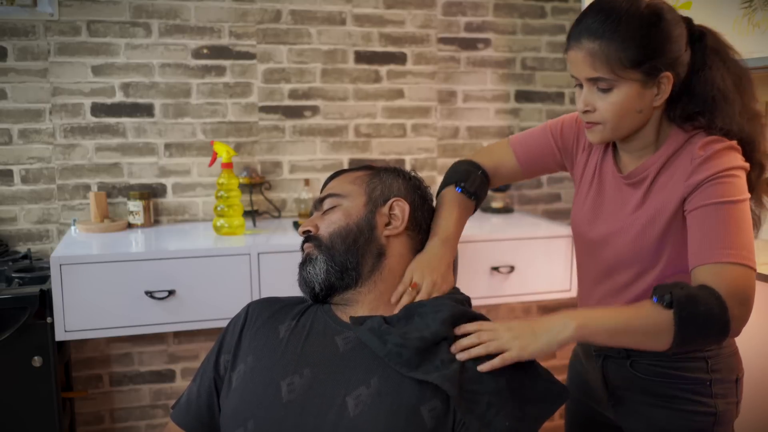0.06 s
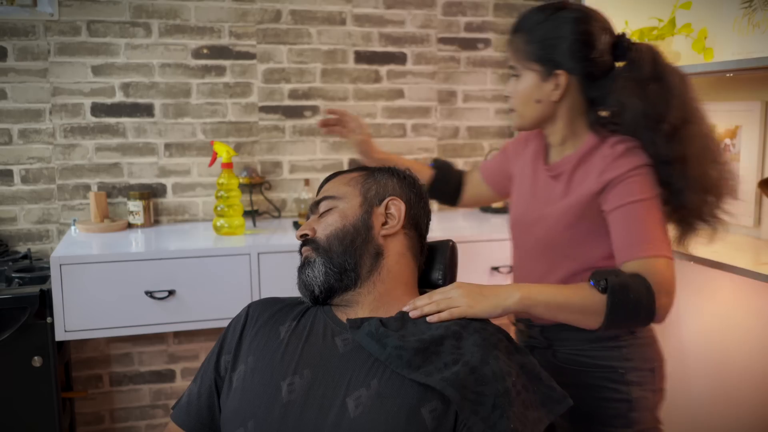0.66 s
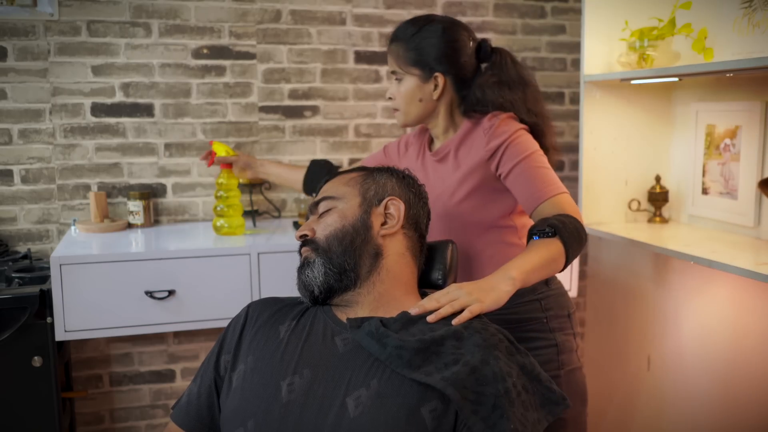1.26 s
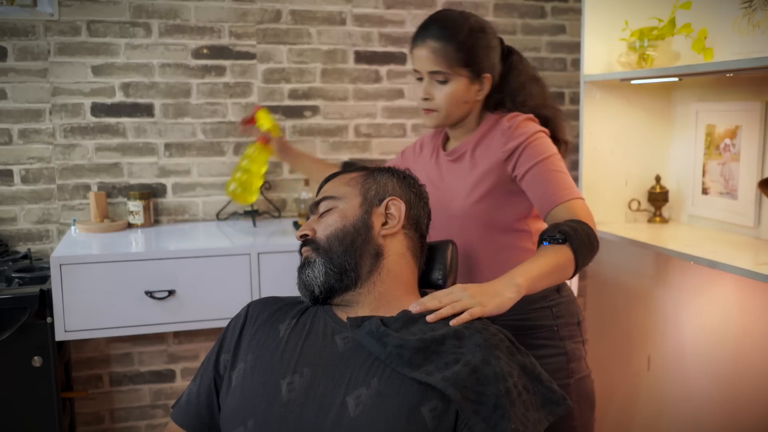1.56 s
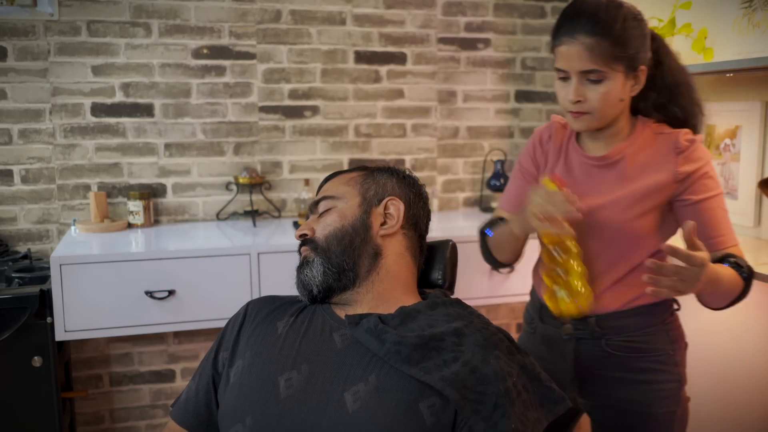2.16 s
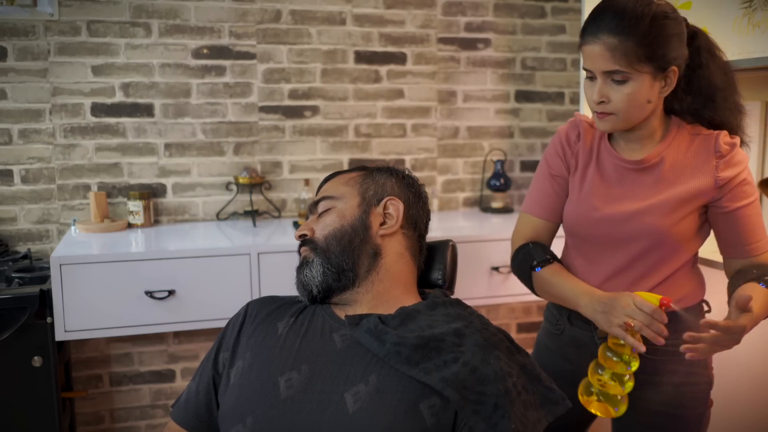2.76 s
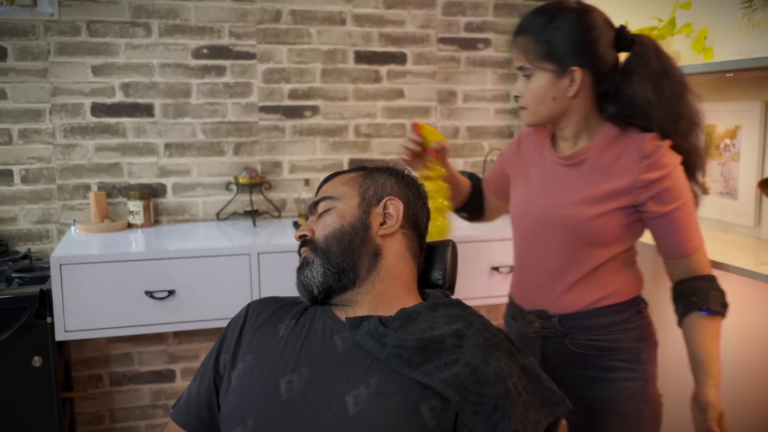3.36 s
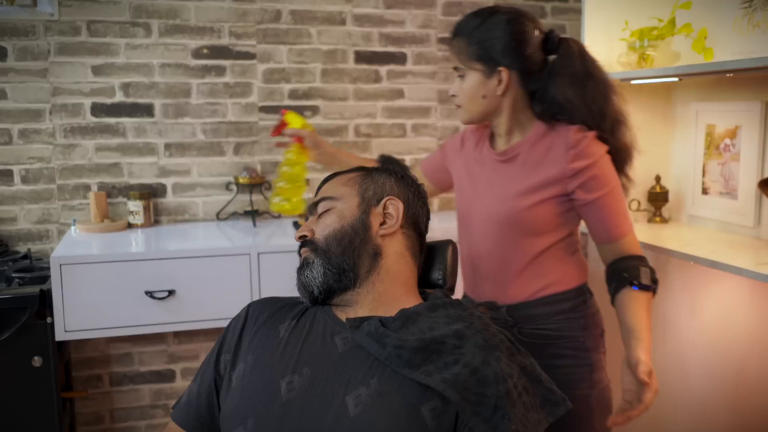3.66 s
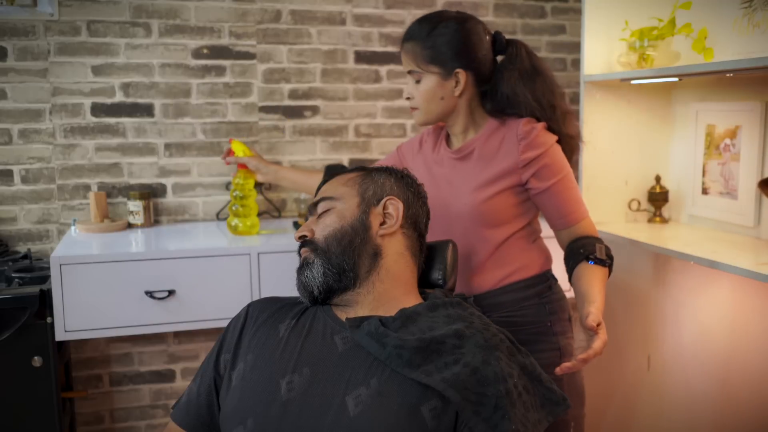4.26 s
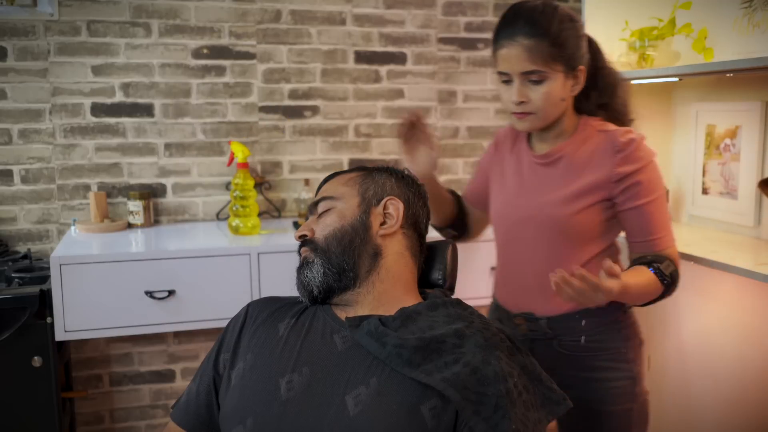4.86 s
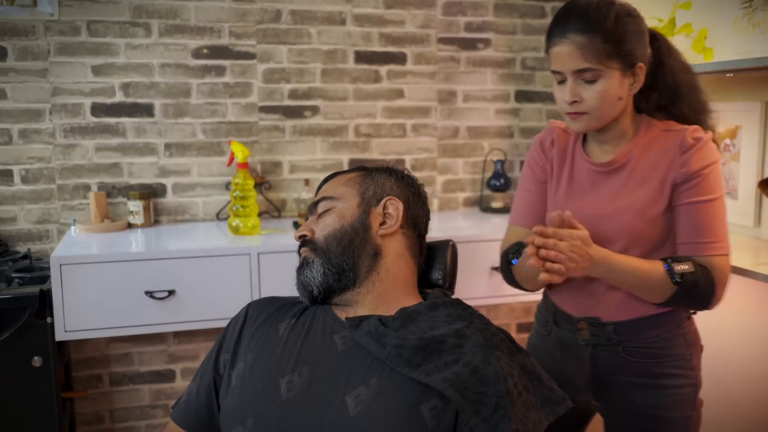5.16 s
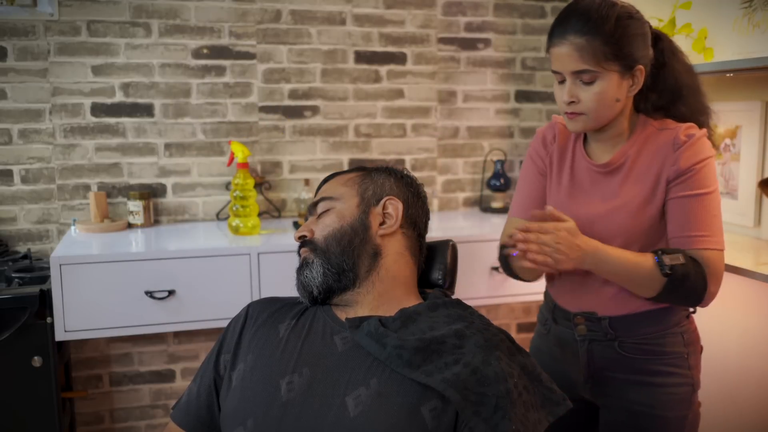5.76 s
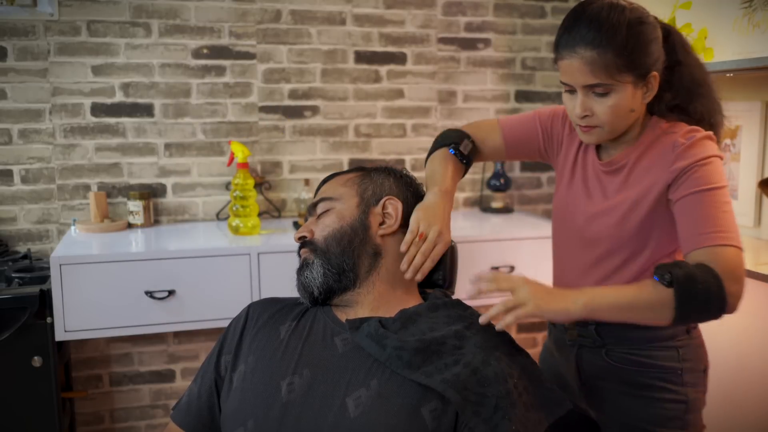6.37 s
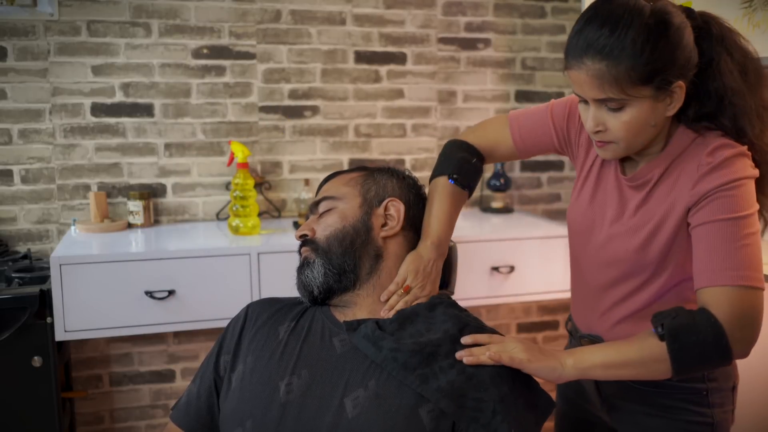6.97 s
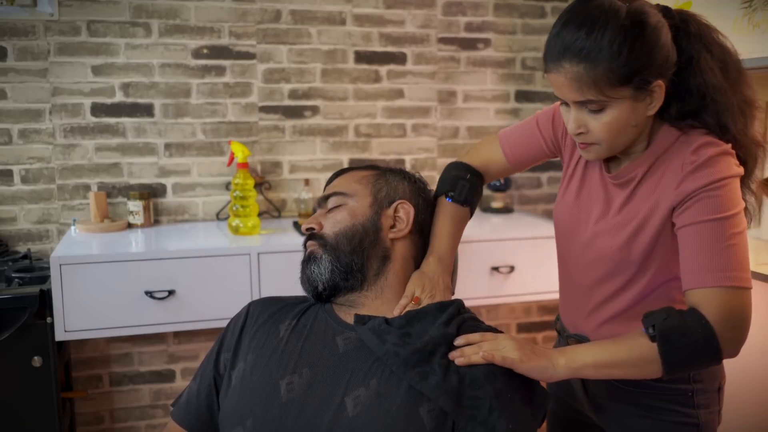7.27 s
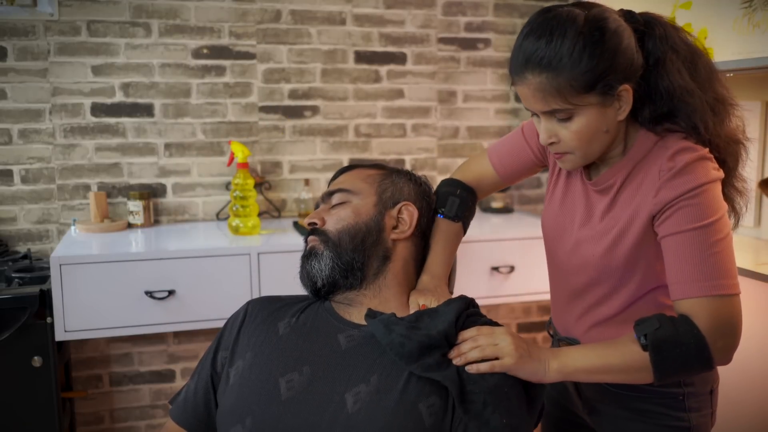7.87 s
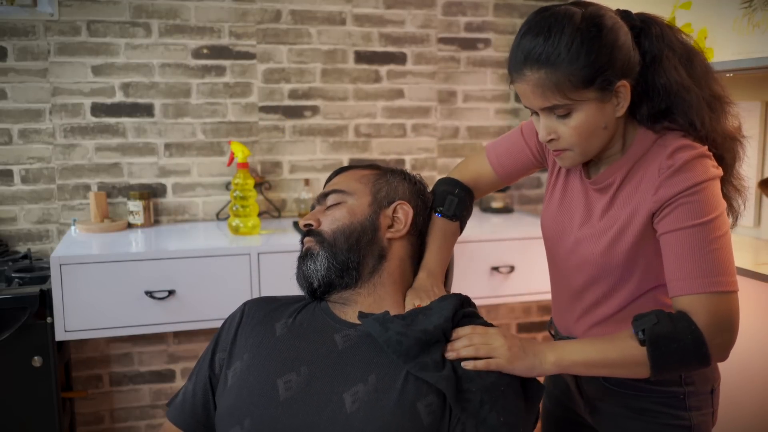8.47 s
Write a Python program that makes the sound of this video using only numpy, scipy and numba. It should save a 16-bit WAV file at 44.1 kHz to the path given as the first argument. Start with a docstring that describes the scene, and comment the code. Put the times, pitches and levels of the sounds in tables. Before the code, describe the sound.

Close up in a quiet room with a low rumble and slight reverb, a spray bottle gives two short hisses of mist, each followed by a clicking trigger creak. Light knocks and thuds lead into five brisk, rasping strokes of wet hands rubbed together, puffing as they cup. Then comes gentle rubbing over skin and cloth, a fine hiss with a few ticks and a brief dull groan like shifting furniture.

```python
"""A plastic spray bottle spits and hisses twice onto a masseuse's palm, its trigger creaking back in runs
of stick-slip clicks. She sets it down and rubs her wet palms together in five quick strokes: a grainy
rasp through the hollow of her hands, with a puff of air each time they cup. Then she softly rubs a neck
at the edge of a cloth cape, a fine hiss over murmuring folds. Small bumps, ticks and one dull groan
sit around the action, over the low rumble of a quiet, slightly live room."""
import sys
import numpy as np
from scipy import signal
from scipy.fft import rfft, irfft, next_fast_len
from scipy.io import wavfile
from scipy.ndimage import uniform_filter1d
from numba import njit

SR = 44100
rng = np.random.default_rng(int(sys.argv[2]) if len(sys.argv) > 2 else 0)


def transcribe(signal):
    """Save signal, clipped to [-1, 1], as a 16-bit WAV file at the path in sys.argv[1]."""
    frames = np.atleast_2d(signal).T
    limited = np.clip(frames, -1, 1)
    pcm = np.round(limited * 32767).astype(np.int16)
    wavfile.write(sys.argv[1], SR, pcm)


N = 375732
TIME = np.arange(N) / SR

# Room tone spectrum: f/Hz, level/dB
ROOM_TONE_EQ = [(15, -59.5), (25, -22), (55, -3.5), (110, -6), (161, -11), (205, -7), (307, -23),
                (352, -18.5), (637, -24), (749, -25), (955, -28), (2150, -41.5), (2970, -39), (6490, -42.5),
                (15800, -78.5)]
# Standing waves of the room: f/Hz, width/Hz, level/dB
ROOM_MODES = [(108.6, 11, 1.5), (199.3, 18, -9), (230, 14, -7), (350, 37, -16)]
# Colour of the reverb: f/Hz, level/dB
REVERB_EQ = [(100, 14.5), (500, 3), (1500, 0), (3000, -2), (6500, -4.5), (9000, -4), (16000, -9)]
# Reflections off arms, head and chair: delay/s, level/dB
EARLY_ECHOES = [(.0013, -26.5), (.0031, -25.5), (.0058, -16.5)]
# Three pushes of a dull groan, perhaps furniture shifting: t/s, length/s, level/dB, fall/s
GROAN_PUSHES = [(7.14, 0.087, -34, 0.013), (7.25, .04, -36, 0.02), (7.364, 0.023, -43, 0.051)]
# Resonances of the groan: f/Hz, width/Hz, level/dB
GROAN_BODY = [(200.7, 20, 0), (230, 29, -10.5), (377, 17, -4.5), (375, 27.5, 0), (513, 34, -11.5),
              (684, 28, -10), (980, 92, -19.5), (1170, 140, -47)]
# Soft bumps of bottle, hands and feet: t/s, level/dB, f/Hz, swell/s
SOFT_BUMPS = [(1.97, -38, 76, .012), (2.01, -45.5, 150, 0.023), (2.049, -37.5, 103, 0.0087),
              (2.617, -43.5, 106, .025), (2.829, -46.5, 95, 0.041), (4.087, -46.5, 125.3, 0.029),
              (4.565, -36.5, 117.4, .016), (4.788, -35, 73, 0.012), (4.946, -25, 121.6, 0.016),
              (4.9482, -27, 224, 0.0028), (5.018, -39.5, 114.5, .017), (5.095, -36, 101, 0.015),
              (5.16, -41, 67.5, 0.032), (6.216, -23.5, 352, .00083)]
# Ticks, knocks and scuffs of handling, plus two further air puffs as the palms cup: t/s, level/dB, f/Hz,
# width/Hz, decay/s
HANDLING_TICKS = [(.673, -41.5, 1250, 170, .006), (.827, -38, 2740, 900, 0.0024),
                  (1.343, -52, 960, 330, 0.044), (1.7095, -45, 2920, 1510, 0.0014),
                  (1.861, -52.5, 690, 500, 0.0048), (3.493, -47, 2400, 1000, 0.0022),
                  (4.069, -54, 450, 601, 0.0045), (4.078, -48, 236, 209, 0.054),
                  (4.51, -56.5, 1945, 500, .035), (4.527, -50.5, 700, 600, 0.039),
                  (5.118, -45, 504, 743, 0.083), (5.579, -34, 805, 900, 0.0079),
                  (5.818, -32, 1470, 290, 0.0062), (6.252, -37.5, 7860, 2020, .001),
                  (6.923, -42.5, 2540, 1410, 0.0018), (6.987, -31, 3600, 2370, .0018),
                  (7.85, -34.5, 3020, 2800, 0.0013), (7.862, -42.5, 2070, 800, .002)]
# Level curve of one long rub along the neck: t/s, level/dB
NECK_RUB = [(6.5, -85), (6.644, -68), (6.824, -60), (6.93, -60.5), (7.562, -58), (7.822, -62.5),
            (8.068, -63), (8.198, -61), (8.3, -76.5)]
# Short brushes of skin and cloth: t/s, length/s, level/dB, rise/s, fall/s, treble/dB
BRUSHES = [(0, 0.15, -51.5, .02, 0.077, -0.5), (0.662, .03, -60, 0.16, 0.086, -11.5),
           (0.803, .03, -65.5, 0.024, 0.51, -8), (1.668, .012, -55, 0.027, 0.031, -1),
           (1.978, 0.2, -69, .1, .12, -13), (3.773, .01, -68, .03, 0.036, -11),
           (4.48, .04, -81, 0.091, .1, 7), (5.089, 0.034, -58, 0.11, .02, -15),
           (5.99, .09, -54.5, 0.0072, 0.093, -2.5), (6.262, 0.011, -49.5, 0.016, 0.025, 7.5),
           (8.384, 0.074, -50.5, 0.038, .06, 2.5)]
# Spectrum of the soft rubbing hiss: f/Hz, level/dB
RUB_HISS_EQ = [(530, -43), (900, -6.5), (1490, -8.5), (1830, -3.5), (2320, -5), (3660, -1.5), (6660, -1),
               (11000, -11), (12100, -22), (14700, -34), (15800, -54)]
# Palm strokes: t/s, length/s, level/dB, swell/dB, cupping t/s, hollow f/Hz, puff level/dB
PALM_STROKES = [(5.137, .119, -29.5, 13, 5.2, 1560, -62), (5.335, 0.078, -23, 3, 5.385, 1360, -46),
                (5.494, 0.077, -25, 3, 5.548, 1270, -36.5), (5.656, 0.054, -22, 1.5, 5.673, 1520, -35),
                (5.781, 0.076, -22.5, -1.5, 5.826, 1200, -36)]
# Spectrum of wet palms rasping: f/Hz, level/dB
PALM_EQ = [(120, -45), (200, -10), (386, -16.5), (447, -28), (610, -36), (1100, -24), (1470, -22.5),
           (2630, -12.5), (3100, -2), (6110, 4), (8960, -0.5), (14200, -15), (15800, -22.5)]
# Creaks of the returning trigger: t/s, length/s, level/dB, ring f/Hz
TRIGGER_CREAKS = [(2.696, 0.021, -17.5, 6150), (2.722, 0.034, -18, 5970), (2.7743, .004, -20, 2700),
                  (2.987, 0.021, -23, 8700), (3.010, .019, -15.5, 8260)]
# Modes of the plastic spray head: f/Hz, width/Hz, level/dB
HEAD_MODES = [(680, 490, -9.5), (1753, 200, -7.5), (2768, 200, -1), (4220, 1700, -7), (6580, 1680, 1.5),
              (8130, 980, -1.5), (10800, 1500, -16.5)]
# The nozzle sputters until the pressure is up: t/s, spurt rate/Hz, level/dB
NOZZLE_SPUTTER = [(2.485, 552, -50), (2.493, 610, -53), (2.513, 613, -25), (2.526, 654, -37.5)]
# Squeezes of the trigger: t/s, length/s, level/dB
TRIGGER_SQUEEZES = [(2.494, 0.13, -28), (2.789, 0.1, -26)]
# Spectrum of the mist: f/Hz, level/dB
MIST_EQ = [(88, -33.5), (150, -12), (368, -15.5), (430, -3.5), (564, -15.5), (673, -7.5), (1230, -12),
           (1710, -8), (2040, -9.5), (2580, -5.5), (4450, -4.5), (7530, 0.5), (8980, -7), (12300, -8.5),
           (15800, -20)]


def undb(db):
    """Decibels to gain."""
    return 10 ** (np.asarray(db) / 20)


def unit(x):
    """Scale to rms 1."""
    return x / np.sqrt(np.mean(x ** 2))


def noise():
    """White noise for the whole scene."""
    return rng.standard_normal(N)


def wander(rate_hz):
    """Random modulator that glides to a new value rate_hz times a second."""
    return np.interp(TIME * rate_hz, np.arange(N), noise())


def fader(points):
    """Smoothed gain along a (t/s, level/dB) curve, silent outside it."""
    db = np.interp(TIME, *np.transpose(points), left=-200, right=-200)
    return uniform_filter1d(undb(db), size=160)


def envelope(start, length, rise_s, fall_s, swell_db=0, arch_db=0):
    """Gain that rises until start, holds (growing by swell_db, bulging by arch_db) and dies away."""
    along = np.clip((TIME - start) / length, 0, 1)
    edges = np.minimum(TIME - start, 0) / rise_s - np.maximum(TIME - start - length, 0) / fall_s
    return np.exp(np.maximum(edges, -20)) * undb(swell_db * (along - .5) + arch_db * np.sin(np.pi * along))


def colour(x, points):
    """Minimum-phase EQ through (f/Hz, level/dB) points."""
    size = next_fast_len(N + SR // 2, real=True) // 2 * 2
    hz, db = np.transpose(points)
    bins_hz = np.arange(size // 2 + 1) * SR / size
    gain = undb(np.interp(np.log(bins_hz + 1), np.log(hz), db))
    cepstrum = irfft(np.log(gain))
    cepstrum[1:size // 2] *= 2
    cepstrum[size // 2 + 1:] = 0
    return irfft(rfft(x, size) * np.exp(rfft(cepstrum)))[:N]


def band(x, hz, width_hz):
    """One resonance, gain 1 at its centre."""
    return signal.lfilter(*signal.iirpeak(hz, hz / width_hz, fs=SR), x)


def ring(x, modes):
    """Ring a body's (f/Hz, width/Hz, level/dB) modes, with dark valleys between them."""
    return sum(undb(db) * band(band(x, hz, 2 * width), hz, 2 * width) for hz, width, db in modes)


@njit
def sweep(x, hz, damping):
    """Swept resonant filter: returns its band-pass and high-pass outputs."""
    out = np.zeros((2, len(x)))
    mid_state, low_state = 0., 0.
    for i in range(len(x)):
        tuning = np.tan(np.pi * hz[i] / SR)
        mid = (mid_state + tuning * (x[i] - low_state)) / (1 + tuning * (tuning + damping))
        low = low_state + tuning * mid
        mid_state, low_state = 2 * mid - mid_state, 2 * low - low_state
        out[0, i], out[1, i] = damping * mid, x[i] - damping * mid - low
    return out


def grains(rate_hz, spread_db):
    """Dense tiny impacts of uneven size, rms 1."""
    hits = rng.random(N) < rate_hz / SR
    return unit(hits * noise() * undb(spread_db * np.clip(noise(), -2, 2)))


def add(out, start, sound):
    """Mix a short sound in at `start` seconds."""
    first = int(start * SR)
    out[first:first + len(sound)] += sound[:N - first]


def burst(hz, width_hz, decay_s, rise_s=0.00091):
    """A dying noise burst in one broad resonance, soft at the top; peak 1."""
    t = TIME[:SR // 3]
    contact = np.exp(-t / decay_s) * (1 - np.exp(-t / rise_s))
    sound = ring(rng.standard_normal(len(t)) * contact, [(hz, width_hz, 0)])
    sound = signal.sosfilt(signal.butter(4, 9500, fs=SR, output="sos"), sound)
    return sound / np.abs(sound).max()


def add_thud(out, centre_s, db, hz, swell_s):
    """Mix in a few slow cycles of air that swell and fade around centre_s."""
    t = np.arange(-4 * swell_s, 4 * swell_s, 1 / SR)
    thud = -np.sin(2 * np.pi * hz * t) / np.cosh(t / swell_s) ** 2
    add(out, centre_s + t[0], undb(db) * thud)


def room_tone():
    """The bed: a quiet rumble that gathers in standing waves, under a thin hiss."""
    bed = undb(-58.5) * unit(colour(noise(), ROOM_TONE_EQ))
    standing_waves = undb(-57.5) * unit(ring(noise(), ROOM_MODES))
    return (bed + standing_waves) * undb(.7 * wander(4))


def reverb(x, wet_db, t60_s, treble_t60_s):
    """Add diffuse reflections from hard walls; the top dies first."""
    wash = noise()
    low = signal.sosfiltfilt(signal.butter(2, 7000, fs=SR, output="sos"), wash)
    tail = low * undb(-60 * TIME / t60_s) + (wash - low) * undb(-60 * TIME / treble_t60_s)
    tail *= np.clip(TIME / 0.01, 0, 1)
    response = colour(tail / np.sqrt(np.sum(tail ** 2)), REVERB_EQ)[:SR]
    return x + undb(wet_db) * signal.fftconvolve(x, response)[:N]


def early_reflections(x):
    """Close surfaces comb the sound with short echoes."""
    echoes = sum(undb(db) * np.pad(x, (int(delay * SR), 0))[:N] for delay, db in EARLY_ECHOES)
    return undb(-1.63) * (x + echoes)


def groan():
    """Uneven stick-slip pulses ring a few low resonances."""
    body = unit(ring(grains(rate_hz=990, spread_db=0), GROAN_BODY))
    # steady pressure keeps the vibration at an even strength
    body /= np.sqrt(uniform_filter1d(body ** 2, size=3000) + 1e-9)
    load = sum(undb(db) * envelope(start, length, rise_s=0.012, fall_s=fall, arch_db=2.5)
               for start, length, db, fall in GROAN_PUSHES)
    return undb(-5) * body * load


def bumps():
    """Soft contacts of bottle, hands and feet push the air in low thuds."""
    out = np.zeros(N)
    for centre_s, db, hz, swell_s in SOFT_BUMPS:
        add_thud(out, centre_s, db, hz, swell_s)
    return out


def ticks():
    """Each light touch, or puff of the cupping palms, briefly rings one broad resonance."""
    out = np.zeros(N)
    for start, db, hz, width, decay in HANDLING_TICKS:
        add(out, start, undb(db) * burst(hz, width, decay))
    return out


def rubbing():
    """A hand glides over neck and cape: fine hiss, faint narrow squeaks and a murmur of moving cloth."""
    contact = treble = undb(6) * fader(NECK_RUB)
    for start, length, db, rise_s, fall_s, treble_db in BRUSHES:
        brush = undb(db) * envelope(start, length, rise_s, fall_s)
        contact = contact + brush
        treble = treble + undb(treble_db) * brush
    hiss = unit(colour(grains(rate_hz=13000, spread_db=1), RUB_HISS_EQ)) * undb(0.25 * wander(35))
    top = signal.sosfiltfilt(signal.butter(3, 8500, "high", fs=SR, output="sos"), hiss)
    glide = (hiss - top) * contact + top * treble
    squeaks = sum(unit(ring(noise(), [(hz, 200, 0)])) * undb(2.5 * wander(9))
                  for hz in (2450, 3000, 4400, 6300))
    folds = unit(ring(noise(), [(246, 104, 18.5), (381, 77, -8.5), (790, 610, -5)]))
    folds *= undb(2 * wander(45))
    return undb(-3.5) * glide + (undb(-18.5) * squeaks + undb(-7.5) * folds) * contact


def puffs():
    """Each time the palms cup they squeeze out a puff of air with a low thud."""
    out = np.zeros(N)
    decay_s = 0.0081
    for *_, cup_s, _, db in PALM_STROKES:
        add(out, cup_s - decay_s / 2, undb(db) * burst(hz=510, width_hz=290, decay_s=decay_s))
        add_thud(out, cup_s, db - 0.5, hz=77, swell_s=0.0084)
    return out


def palms(open_hz=2420):
    """Wet skin rasps on skin; the hollow between the hands wobbles, resonates and shuts out the lows."""
    effort = np.zeros(N)
    hz = open_hz * np.exp(.075 * wander(70))
    for start, length, db, swell_db, cup_s, hollow_hz, _ in PALM_STROKES:
        # the hands move fastest in mid-stroke
        stroke = envelope(start, length, rise_s=.013, fall_s=.011, swell_db=swell_db, arch_db=2.5)
        effort += undb(db) * stroke
        # the pitch sinks slowly as the palms cup and comes back fast as they open
        cup = np.interp(TIME - cup_s, [-0.92 * length, 0, 0.63 * length], [0, 1, 0])
        hz *= (hollow_hz / open_hz) ** (cup ** 2)
    rasp = colour(grains(rate_hz=25000, spread_db=1.5) * undb(1.3 * wander(180)), PALM_EQ)
    hollow, bright = sweep(rasp, hz, damping=.13)
    overtone, _ = sweep(rasp, hz * 2.1, damping=.08)
    grip = undb(2.5 * wander(35))  # the grip opens and seals, so the resonance comes and goes
    cupped = (undb(19.5) * hollow + undb(-9) * overtone) * grip
    skin = unit(undb(-3) * rasp + undb(-11.5) * bright + cupped)
    heel_drag = unit(band(noise(), hz=225, width_hz=330)) * undb(3.6 * wander(28))
    return (undb(-4) * skin + undb(-31) * heel_drag) * effort


def slip(hz, snap_s=.0003, scrape_s=0.0093):
    """One slip of the trigger snaps the plastic head and scrapes on briefly."""
    t = TIME[:1024]
    friction = rng.standard_normal(len(t))
    snap = friction * np.exp(-t / snap_s)
    click = ring(snap, HEAD_MODES) + ring(snap, [(hz, 1300, 0)])
    scrape = ring(friction * np.exp(-t / scrape_s), HEAD_MODES)
    return click / np.abs(click).max() + undb(-14) * scrape


def trigger(slip_hz=369, jitter=.16, scatter_db=1.9):
    """The trigger sticks and slips on its way back, in short runs at a nearly even rate."""
    out = np.zeros(N)
    for start, length, db, hz in TRIGGER_CREAKS:
        elapsed = 0
        for gap, size in np.clip(rng.standard_normal(size=(16, 2)), -2, 2):
            click = slip(hz)
            if elapsed < length:
                arch_db = 3.5 * np.sin(np.pi * elapsed / length)  # strongest in mid-creak
                add(out, start + elapsed, undb(db + arch_db + scatter_db * size) * click)
            elapsed += np.exp(jitter * gap) / slip_hz
    return out


def spray():
    """The nozzle spits in quick pulses, then breaks the jet into a fluttering hiss of droplets."""
    droplets = noise() * undb(wander(600))
    # the pressure builds through a squeeze and is highest past its middle
    flow = sum(undb(db) * envelope(start, length, rise_s=0.0035, fall_s=0.01, swell_db=6, arch_db=4)
               for start, length, db in TRIGGER_SQUEEZES)
    mist = undb(-0.73) * unit(colour(droplets, MIST_EQ)) * flow
    times, spurt_hz, db = np.transpose(NOZZLE_SPUTTER)
    phase = np.cumsum(np.interp(TIME, times, spurt_hz)) / SR % 1
    spurts = unit(colour(noise() * np.exp(-phase / 0.24), MIST_EQ))
    flow_tone = np.sin(2 * np.pi * phase)  # the pulsing flow sounds its own pitch
    sputter = (undb(-6) * spurts + undb(-3) * flow_tone) * fader(np.c_[times, db])
    return mist + sputter


def scene():
    """The mix: close handling in a light reverb, with bumps and puffs left dry, over the room tone."""
    close = early_reflections(spray() + palms() + rubbing())
    handling = close + undb(-0.5) * trigger() + ticks() + groan()
    in_room = reverb(handling, wet_db=-11, t60_s=0.54, treble_t60_s=0.36)
    return (in_room + bumps() + puffs() + room_tone())[None]


def record(dry):
    """Master EQ: roll off the deepest bass and cut the very top steeply."""
    low_cut = signal.butter(4, 36, "high", fs=SR, output="sos")
    high_cut = signal.ellip(10, .2, 70, 15850, fs=SR, output="sos")
    return signal.sosfilt(high_cut, signal.sosfilt(low_cut, dry))


dry = scene()
out = record(dry)
transcribe(out)
```